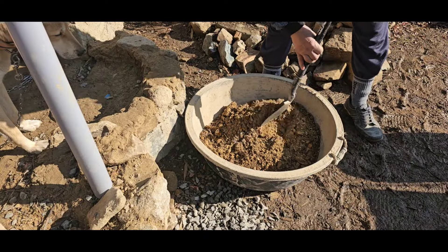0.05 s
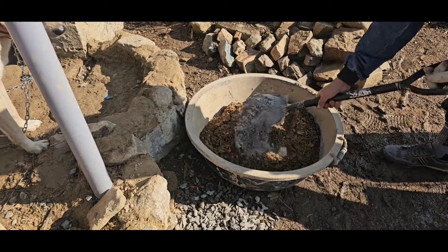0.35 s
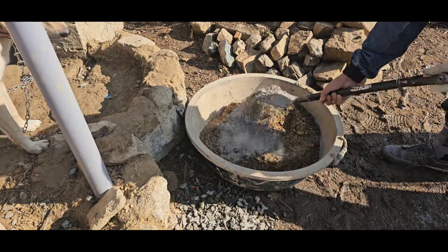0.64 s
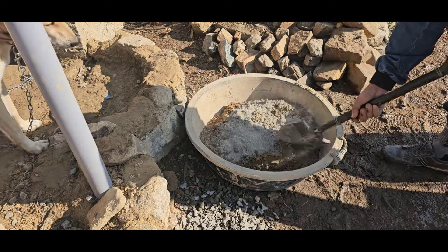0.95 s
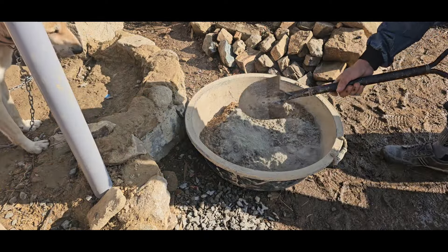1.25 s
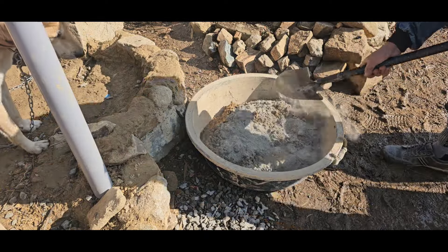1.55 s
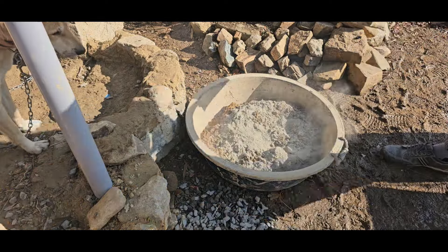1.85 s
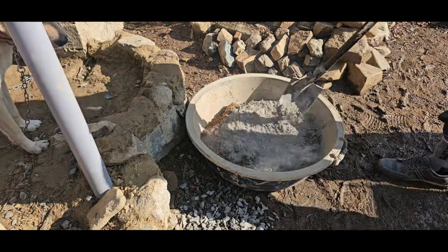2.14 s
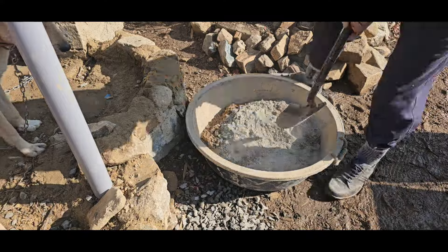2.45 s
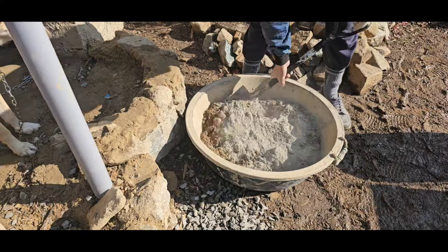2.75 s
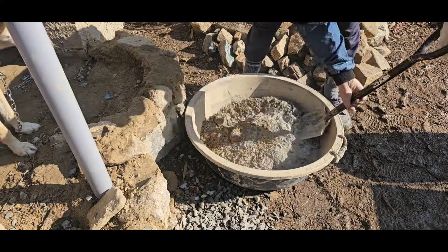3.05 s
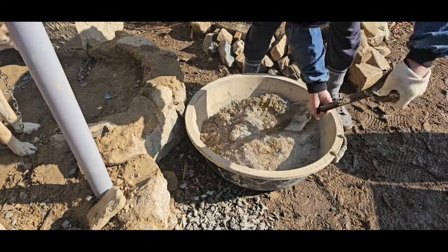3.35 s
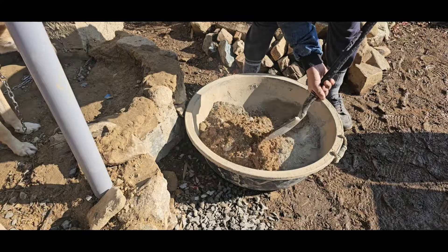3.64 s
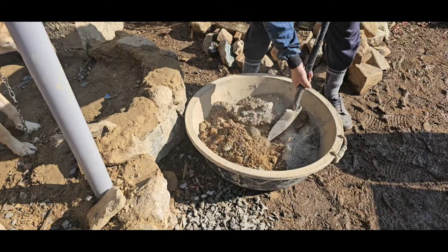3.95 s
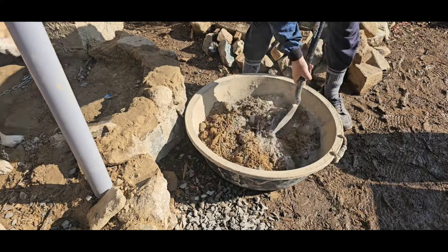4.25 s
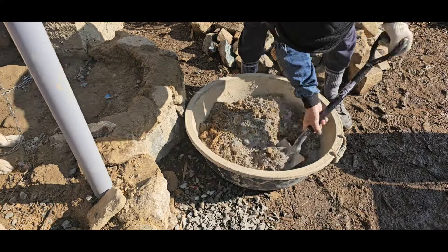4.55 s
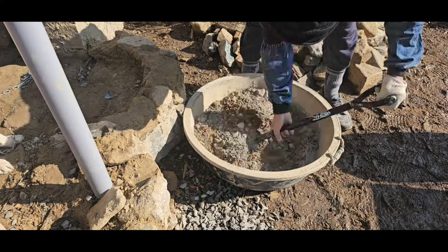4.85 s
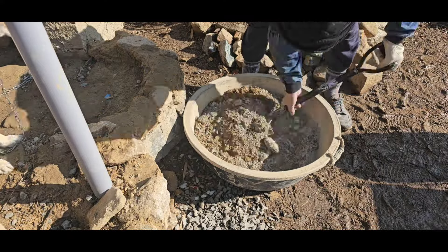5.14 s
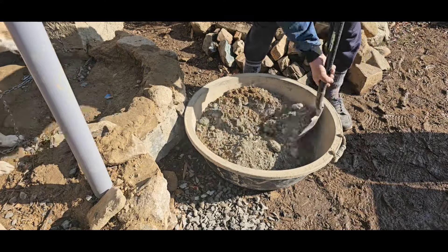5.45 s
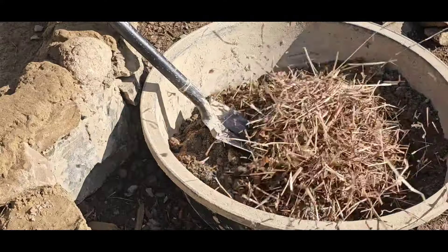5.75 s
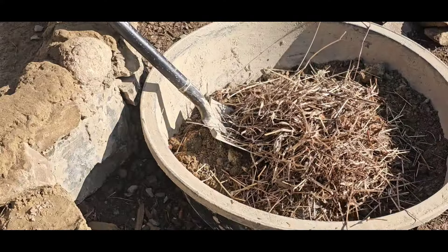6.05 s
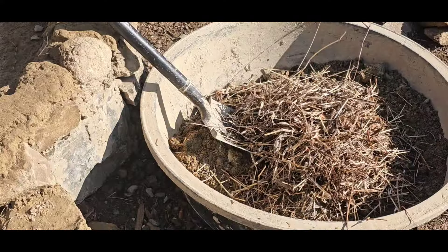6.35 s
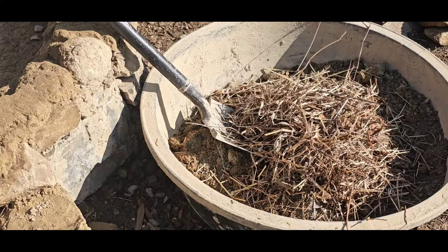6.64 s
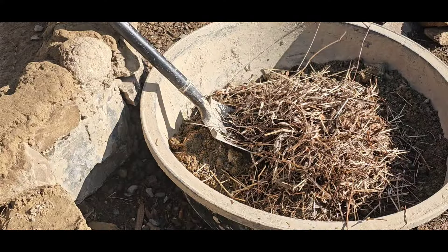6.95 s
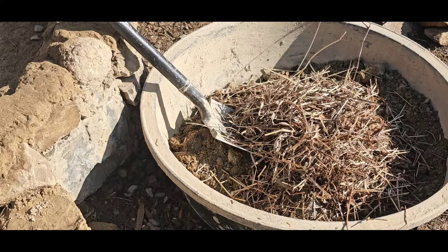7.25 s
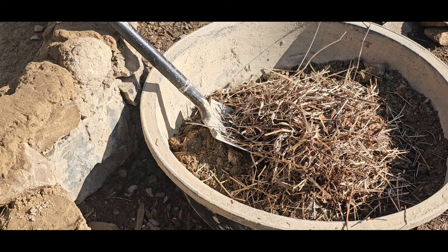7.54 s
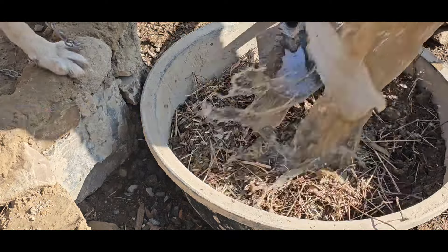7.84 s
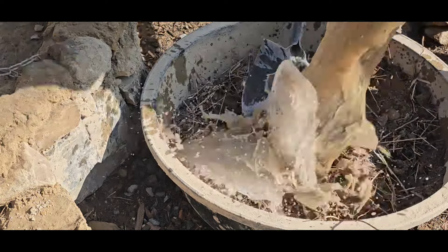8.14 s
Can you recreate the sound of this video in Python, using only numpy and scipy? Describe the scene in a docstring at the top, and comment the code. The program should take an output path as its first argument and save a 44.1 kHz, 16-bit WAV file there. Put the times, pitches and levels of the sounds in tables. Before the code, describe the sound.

A small shovel scrapes gritty soil and knocks on a plastic basin, then straw rustles and water splashes in.

```python
"""A small steel shovel chops and scrapes dry soil and powder in a plastic basin, close to a stereo pair
outdoors. The blade sticks and slips through grit, cracking clods and spilling crumbs; early on it
knocks twice, hard, on the basin. Dry straw drops on the heap and rustles as a light wind reaches the
microphones. Then muddy water is dumped in, splashing and gurgling, and the blade clangs twice."""
import sys
import numpy as np
from scipy import signal
from scipy.fft import rfft, irfft
from scipy.io import wavfile

SR = 44100
rng = np.random.default_rng(int(sys.argv[2]) if len(sys.argv) > 2 else 0)


def pcm_store(signal):
    """Save signal as 16-bit PCM."""
    levels = np.round(np.clip(np.atleast_2d(signal), -1, 1) * 32767)
    wavfile.write(sys.argv[1], SR, levels.astype(np.int16).T)


N = 370440
TIME = np.arange(N) / SR
RIPPLE_DB = 3  # each point of contact has its own small resonances


def gain_of(db):
    return 10 ** (np.asarray(db) / 20)


def unit_rms(x):
    return x / np.sqrt(np.mean(x ** 2) + 1e-20)


def as_hit(x):
    """Scales a short sound to the energy of a hundredth of a second at level 1."""
    return x / np.sqrt(np.mean(np.sum(x ** 2, -1)) / (SR / 100) + 1e-20)


def value_at(curve, hz):
    curve_hz, values = np.transpose(curve)
    return np.interp(np.log(hz + 1), np.log(curve_hz + 1), values)


def add(mix, start_s, sound):
    part = mix[:, max(round(start_s * SR), 0):][:, :sound.shape[-1]]
    part += sound[..., :part.shape[1]]


def colour(x, spectrum, ripple_db=0, size=2048):
    """Causal filter that keeps clicks sharp, with optional random ripple on its spectrum."""
    hz = abs(np.fft.fftfreq(size, 1 / SR))
    ripple = np.interp(hz / 210, np.arange(128), rng.standard_normal(128))
    log_gain = np.log(gain_of(value_at(spectrum, hz) + ripple_db * ripple))
    taps = np.fft.ifft(np.exp(np.conj(signal.hilbert(log_gain)))).real[:size // 2]
    return signal.oaconvolve(x, taps[None], axes=1)[:, :x.shape[1]]


def resonate(x, hz, width_hz):
    """A broad resonance with steep skirts."""
    b, a = signal.iirpeak(min(hz, SR / 3), max(hz / width_hz, .5), fs=SR)
    return signal.lfilter(b, a, signal.lfilter(b, a, x))


def wander(n, per_s):
    """A slow random curve of about unit size."""
    return np.interp(np.arange(n) * per_s / SR, np.arange(4096), rng.standard_normal(4096))


def swell(t, rise_s, fall_s):
    """Grows towards time zero and dies away after it."""
    return np.exp(-abs(t) / np.where(t < 0, rise_s, fall_s))


def ring(modes, t60, t):
    """The modes of a struck body, dying away together."""
    return sum(gain_of(db - 60 * t / t60) * np.sin(2 * np.pi * hz * t) for hz, db in modes)


# How alike the two microphones hear the yard. Each row: frequency in Hz, coherence from 0 to 1.
PAIR_COHERENCE = [(300, 0.95), (1200, 0.88), (2500, 0.62), (10000, 0.14)]

def mic_pair(x):
    """Two unrelated signals become a microphone pair: alike in the bass, apart in the treble."""
    alike = value_at(PAIR_COHERENCE, np.fft.rfftfreq(x.shape[1], 1 / SR))
    mid, side = rfft(x) * np.sqrt([(1 + alike) / 2, (1 - alike) / 2])
    return irfft([mid + side, mid - side], x.shape[1])


def noise(n):
    return mic_pair(rng.standard_normal((2, n)))


def grains(n, per_s, spread_db, clumps_per_s, clump_db=3, dust=0.12):
    """Tiny impacts of uneven size that come in clumps, over a fine dust of noise."""
    sizes = gain_of(spread_db * np.minimum(rng.exponential(1, n), 4))
    impacts = sizes * (rng.random(n) < per_s / SR) * rng.choice([-1., 1.], (2, n))
    clicks = unit_rms(impacts) + dust * rng.standard_normal((2, n))
    return mic_pair(clicks * gain_of(clump_db * wander(n, clumps_per_s)))


# Open air all around the yard. Each row: frequency in Hz, relative level in dB.
AIR_SPECTRUM = [(25, -18.5), (150, -6.5), (2000, -22), (15000, -31.5)]
# Wind right on the microphones. Each row: time in seconds, level in dB.
WIND_LEVELS = [(5.7, -87), (5.78, -69.5), (7, -67.5)]

def air_and_wind(air_db=-79):
    """Faint even air, and wind buffeting the microphones with a lumpy rumble."""
    air = unit_rms(colour(noise(N), AIR_SPECTRUM))
    gusts = noise(N) * gain_of(1.6 * wander(N, per_s=8.5))
    rumble = signal.sosfilt(signal.butter(2, [22, 105], "band", fs=SR, output="sos"), gusts)
    wind_db = np.interp(TIME, *np.transpose(WIND_LEVELS))
    return gain_of(air_db) * air + gain_of(wind_db) * unit_rms(rumble)


def yard(x, wet_db=-19, t60=0.21, dull_hz=2600):
    """Adds weak, dull scatter from the stones and walls around, different at each microphone."""
    t = np.arange(SR // 2) / SR
    tail = rng.standard_normal((2, len(t))) * gain_of(-60 * t / t60)
    tail = signal.lfilter(*signal.butter(1, dull_hz, fs=SR), tail / np.linalg.norm(tail[0]))
    return x + gain_of(wet_db) * signal.oaconvolve(x, tail, axes=1)[:, :N]


def snap(s, db, hz, crack_db, crush_s=0.0012, soil_db=0):
    """A crumb creaks, cracks and crumbles, ringing what it touches and the soil; gives start, sound."""
    t = np.arange(-256, 1792) / SR
    creak = 0.16 * np.exp(-abs(t) / 0.0018)
    crumble = np.exp(-abs(t) / crush_s) + 0.053 * np.exp(-abs(t) / 0.01)
    click = 2.5 * (t == 0) * [[1], [0]]
    burst = mic_pair(rng.standard_normal((2, len(t))) * np.where(t < 0, creak, crumble) + click)
    soil = gain_of(soil_db) * as_hit(colour(burst, RASP_SPECTRUM, RIPPLE_DB))
    body = as_hit(soil + as_hit(resonate(burst, hz, 0.7 * hz)))
    crack = gain_of(crack_db) * as_hit(colour(burst, GRIT_SPECTRUM, RIPPLE_DB))
    return s + t[0], gain_of(db) * (body + crack)


# Soil sliding off the blade and down the heap.
# Each row: middle in seconds, half length in seconds, level in dB.
SOIL_SPILLS = [(1.099, 1.88, -87.5), (3.515, 0.071, -64.5), (3.689, 0.093, -67.5), (4.78, 0.072, -58.5),
               (5.077, 0.13, -61), (5.546, 0.039, -58)]

def spills(crumbs_per_s=34, crumb_db=6.5, spread_db=14, hiss_db=-6, steel_hz=2322):
    """Fine soil trickles over steel; loose bits roll with it, each its own size and pitch, few large."""
    out, power = np.zeros((2, N)), np.zeros(N)
    fines = grains(N, per_s=7100, spread_db=6.5, clumps_per_s=210)
    trickle = unit_rms(resonate(fines, steel_hz, 1600)) + unit_rms(colour(fines, RASP_SPECTRUM))
    trickle += gain_of(hiss_db) * unit_rms(colour(fines, GRIT_SPECTRUM))
    for middle, half, db in SOIL_SPILLS:
        slide = np.exp(-np.minimum(((TIME - middle) / half) ** 2, 20))
        power += (gain_of(db) * slide) ** 2
        for when, size, pitch, softness in rng.random((round(2 * half * crumbs_per_s), 4)):
            s = middle + half * (2 * when - 1)
            bit_db = db + crumb_db + spread_db * (size ** 2 - .5)
            add(out, *snap(s, bit_db, hz=1500 * 2 ** pitch, crack_db=-14 * softness))
    return out + np.sqrt(power) * unit_rms(trickle)


# Straw moving on the heap, a little to the right. Each row: crest, rise and fall in seconds,
# crackle level in dB, low rustle in dB relative to the crackle.
STRAW_MOVES = [(5.777, 0.011, 0.06, -39.5, -20), (5.849, 0.027, 0.086, -40, -10),
               (6.533, 0.0051, 0.017, -41.5, -7.5), (6.65, 0.14, 0.12, -54, -13),
               (6.958, 0.11, 0.059, -50.5, -21), (7.278, 0.027, 0.054, -47.5, -7),
               (7.42, 0.15, 0.22, -58.5, -6.5)]
# The crackle of dry stalks. Each row: frequency in Hz, relative level in dB.
STALK_SPECTRUM = [(500, -17.5), (1800, -4.5), (6000, -1), (15000, -2.5)]
# Single stalks snapping. Each row: time in seconds, level in dB.
STALK_BREAKS = [(5.77, -44.5), (5.809, -37), (6.142, -59.5), (7.0196, -55.5), (7.144, -67.5),
                (7.2746, -47.5), (7.618, -64)]

def straw(scratch_db=-12, tick_db=-7):
    """Fine stalks crackle together and stiff ones tick singly, over the soft rustle of the bundle."""
    moves = np.array([gain_of(db) * swell(TIME - s, rise, fall) for s, rise, fall, db, _ in STRAW_MOVES])
    crackle_level = np.linalg.norm(moves, axis=0)
    rustle_level = np.linalg.norm(moves * gain_of([[db] for *_, db in STRAW_MOVES]), axis=0)
    stalks = unit_rms(grains(N, per_s=14000, spread_db=0, clumps_per_s=260))
    stalks += gain_of(tick_db) * unit_rms(grains(N, per_s=70, spread_db=4, clumps_per_s=10))
    bundle = grains(N, per_s=4500, spread_db=4, clumps_per_s=49)
    out = crackle_level * unit_rms(colour(stalks, STALK_SPECTRUM))
    out += rustle_level * unit_rms(resonate(bundle, 440, 600))
    out += gain_of(scratch_db) * crackle_level * unit_rms(resonate(bundle, 2000, 750))
    for s, db in STALK_BREAKS:
        add(out, *snap(s, db, hz=10600, crack_db=-5.5, crush_s=0.0011, soil_db=-19))
    return out * gain_of([[-1], [1]])


def bubbles(start_s, low_hz, high_hz, per_s, cycles=9, pitches=20):
    """One second of air pockets, each a short note that rises as it nears the surface."""
    out, t = np.zeros((2, N)), np.arange(SR // 5) / SR
    for hz in np.geomspace(low_hz, high_hz, pitches):
        age = hz * t / cycles
        note = np.sin(2 * np.pi * hz * t * (1 + 0.117 * np.tanh(age / 2))) * np.exp(-age)
        for delay, size, pan in rng.random((round(per_s / pitches), 3)):
            add(out, start_s + delay, gain_of(20 * size) * np.sqrt([[1 - pan], [pan]]) * note)
    return out / np.sqrt(np.mean(out[:, TIME > start_s] ** 2))


# Water splashing and churning in the basin, close up. Each row: frequency in Hz, relative level in dB.
SPLASH_SPECTRUM = [(250, -18.5), (700, 15.5), (1400, 13.5), (4000, 7.5), (8000, 0.5)]
CHURN_SPECTRUM = [(30, -14), (100, 2.5), (175, 14.5), (550, 1), (2500, -25)]
# Slugs of water that swell the pour. Each row: time in seconds, level in dB over the steady flow.
WATER_SURGES = [(7.953, 9), (8.022, 2.5), (8.128, 1), (8.192, 5), (8.361, 2.5)]

def pour(start_s=7.668, splash_db=-32, churn_db=-39, sag_db_per_s=7,
         fizz_db=-5, spray_db=-5, gurgle_db=-1):
    """Water hits straw and soil: it churns at once, splashes more as it pools, and each slug slaps."""
    age = np.maximum(TIME - start_s, 0)
    surges = sum(gain_of(db) * swell(TIME - s, rise_s=0.002, fall_s=0.02) for s, db in WATER_SURGES)
    flow = gain_of(-sag_db_per_s * age) * (1 + surges)
    pooled = np.minimum(age / 0.2, 1)
    churn_onset = np.minimum(age / 0.045, 1) ** 2
    drops = grains(N, per_s=5000, spread_db=4.5, clumps_per_s=55)
    slugs = grains(N, per_s=1600, spread_db=2.5, clumps_per_s=62)
    droplets = grains(N, per_s=6100, spread_db=4, clumps_per_s=140)
    splash = unit_rms(colour(drops, SPLASH_SPECTRUM))
    splash += gain_of(fizz_db) * bubbles(start_s, 599, 7970, per_s=400)
    splash += gain_of(spray_db) * pooled * unit_rms(colour(droplets, GRIT_SPECTRUM))
    churn = unit_rms(colour(slugs, CHURN_SPECTRUM))
    churn += gain_of(gurgle_db) * pooled * bubbles(start_s, 191.6, 867, per_s=100, cycles=5.5)
    out = flow * (gain_of(splash_db) * pooled * splash + gain_of(churn_db) * churn_onset * churn)
    for s, db in WATER_SURGES:
        add(out, *snap(s, splash_db + db, hz=1510, crack_db=0, crush_s=0.0055))
    return out


# Modes of the plastic basin. Each row: frequency in Hz, relative level in dB.
BASIN_MODES = [(120, -6), (178, -2.5), (244, -5.5), (388, 3), (527, -3), (625, 0.5), (760, -3)]

def knock(s, db, hz, decay_s, ring_db=-11, t60=0.11, rattle_db=-14, crack_db=-28):
    """A damped swing of the plastic wall, its low modes and soil rattling inside; gives start, sound."""
    t = np.arange(SR // 4) / SR
    swing = -np.sin(2 * np.pi * hz * t) * np.exp(-t / decay_s) * (1 - np.exp(-t / 0.00078))
    wall = as_hit(swing) + gain_of(ring_db) * as_hit(ring(BASIN_MODES, t60, t))
    jolt = noise(len(t)) * (np.exp(-t / 0.0056) + 0.11 * np.exp(-t / 0.032))
    rattle = gain_of(rattle_db) * as_hit(colour(jolt, RASP_SPECTRUM, RIPPLE_DB))
    crack = gain_of(crack_db) * as_hit(colour(jolt, GRIT_SPECTRUM))
    return s, gain_of(db) * (wall + rattle + crack)


# Heavy slugs of water on the basin floor. Each row: start in seconds, level in dB, pitch in Hz.
WATER_PLUNGES = [(8.025, -16.5, 409), (8.0321, -14, 584), (8.037, -19, 273), (8.197, -30, 261),
                 (8.2673, -17, 423), (8.342, -23.5, 490)]

def plunges(decay_cycles=4.3, heave_hz=198):
    """Plunging water swings the wall for several cycles and heaves the whole basin."""
    out = np.zeros((2, N))
    for s, db, hz in WATER_PLUNGES:
        add(out, *knock(s, db, hz, decay_cycles / hz))
        add(out, *knock(s, db, heave_hz, decay_s=0.002))
    return out


# Soil and straw landing in the basin. Each row: start in seconds, level in dB, pitch in Hz.
SOFT_LANDINGS = [(0.3531, -40.5, 503), (1.0098, -48.5, 326), (2.72, -53, 147), (3.355, -43, 400),
                 (4.3948, -44, 302), (4.6414, -42.5, 259), (5.381, -41, 257), (7.2737, -45.5, 496),
                 (7.3858, -40.5, 524)]

def thumps(decay_cycles=1.07):
    """A soft load gives the wall a dull swing that dies at once."""
    out = np.zeros((2, N))
    for s, db, hz in SOFT_LANDINGS:
        add(out, *knock(s, db, hz, decay_cycles / hz))
    return out


# Hard raps of the shovel on the basin, close up. Each row: start in seconds, level in dB.
SHOVEL_RAPS = [(1.4769, -17), (1.6936, -17.5)]

def raps(decay_s=0.0012, rebound_s=0.0065, settle_s=0.088):
    """The shovel hits the wall, rebounds and touches again; the jolted soil then lands."""
    out = np.zeros((2, N))
    for s, db in SHOVEL_RAPS:
        add(out, *knock(s, db, hz=654, decay_s=decay_s))
        add(out, *knock(s + rebound_s, db - 10, hz=477, decay_s=decay_s))
        add(out, *snap(s + settle_s, db - 39, hz=900, crack_db=-35))
    return out


# Modes of the steel blade. Each row: frequency in Hz, relative level in dB.
BLADE_MODES = [(1543, -0.5), (1814, -6.5), (1967, 2.5), (2685, -10.5), (3170, -10.5)]
# The blade struck during the pour.
# Each row: start in seconds, level in dB, seconds for the ring to fall 60 dB, pitch ratio.
BLADE_STRIKES = [(7.951, -25, 0.52, 1), (8.024, -21, 0.16, 1.06)]

def clangs(wash_db=-2):
    """The blade clangs in a wash of splashing that outlasts the ring; water damps the second clang."""
    out, t = np.zeros((2, N)), np.arange(SR // 2) / SR
    for s, db, t60, pitch in BLADE_STRIKES:
        wash = colour(noise(len(t)), SPLASH_SPECTRUM) * np.exp(-t / 0.099)
        steel = ring([(hz * pitch, mode_db) for hz, mode_db in BLADE_MODES], t60, t)
        add(out, s, gain_of(db) * (steel + gain_of(wash_db) * as_hit(wash)))
    return out


# Pebbles meeting the blade. Each row: time in seconds, level in dB.
PEBBLE_TICKS = [(0.17, -64), (0.2146, -46.5), (2.8921, -39.5), (3.639, -53.5), (3.7802, -35.5),
                (3.928, -41.5), (4.047, -40.5), (4.5703, -44.5), (4.7991, -33.5), (4.805, -34),
                (5.087, -43.5), (5.306, -43)]

def pebbles(centre_hz=2230, spread_octaves=0.5):
    """Pebbles tick on the steel, each at a slightly different pitch."""
    out = np.zeros((2, N))
    for s, db in PEBBLE_TICKS:
        hz = centre_hz * 2 ** (spread_octaves * (rng.random() - .5))
        add(out, *snap(s, db, hz, crack_db=-11.5, crush_s=0.00093, soil_db=-6.5))
    return out


# Clods and grit under the blade. Each row: time in seconds, level in dB, crack in dB over the body.
CLOD_CRACKS = [(0.2675, -45, -22), (1.825, -71, 7.5), (2.7421, -51.5, 7.5), (2.7932, -37.5, -6),
               (3.355, -40.5, 0.5), (3.7542, -31, 3), (3.8828, -35.5, -11.5), (3.9089, -31, -2.5),
               (4.0237, -26.5, -7.5), (4.129, -51, 6), (4.17, -44.5, -4.5), (4.3017, -33, 1.5),
               (4.3932, -34.5, -3), (4.8557, -33, -3), (5.0327, -35.5, -3.5), (5.1334, -34, -7.5),
               (5.372, -55, 19)]

def clods():
    """Clods crack at the pitch of the push that starts nearest in time."""
    out = np.zeros((2, N))
    for s, db, crack_db in CLOD_CRACKS:
        *_, hz = min(SHOVEL_PUSHES, key=lambda push: abs(push[0] - s))
        add(out, *snap(s, db, hz, crack_db, crush_s=0.0025))
    return out


# The rasp of dry soil and the hiss of its grit. Each row: frequency in Hz, relative level in dB.
RASP_SPECTRUM = [(80, -28.5), (420, 0.5), (1000, 9.5), (2600, 5.5), (3600, -9.5), (7000, -19.5)]
GRIT_SPECTRUM = [(1200, -66.5), (3000, -7.5), (4500, 0.5), (8500, -4), (15000, -14)]
# Pushes of the blade through soil, close to the microphones.
# Each row: start in seconds, length in seconds, level in dB, centre of the rasp in Hz.
SHOVEL_PUSHES = [(0.234, 0.06, -49.5, 477), (0.31, 0.049, -41.5, 564), (0.403, 0.0091, -47.5, 1120),
                 (0.609, 0.076, -55.5, 406), (1.115, 0.022, -61.5, 416), (1.154, 0.032, -62.5, 375),
                 (1.915, 0.024, -55.5, 900), (2.127, 0.01, -50, 850), (2.275, 0.0047, -63, 950),
                 (2.382, 0.016, -60, 3170), (2.571, 0.018, -45, 1330), (2.66, 0.019, -53, 2200),
                 (2.736, 0.06, -43.5, 1170), (2.994, 0.0097, -45.5, 980), (3.029, 0.036, -52.5, 980),
                 (3.116, 0.053, -45.5, 980), (3.303, 0.019, -52, 1140), (3.35, 0.05, -43, 1440),
                 (3.408, 0.054, -37, 2380), (3.723, 0.04, -44.5, 2280), (3.864, 0.047, -42.5, 1170),
                 (4.008, 0.017, -37, 1470), (4.122, 0.036, -52, 1990), (4.261, 0.019, -40.5, 2350),
                 (4.392, 0.0073, -40, 836), (4.487, 0.012, -52, 1620), (4.573, 0.057, -29.5, 1196),
                 (4.849, 0.051, -33, 1281), (4.983, 0.012, -50.5, 1540), (5.121, 0.067, -36, 1005),
                 (5.374, 0.024, -39.5, 1180), (5.412, 0.033, -34.5, 1580), (5.452, 0.031, -36.5, 1400),
                 (5.591, 0.022, -39, 2200), (5.612, 0.028, -35.5, 1210)]

def shovel(bite_s=0.0059, swell_db=10.5, release_s=0.011, crumble_db=-22, crumble_s=0.046,
           broad_hz=1900, note_hz=1120, note_full_db=-23.5):
    """The blade sticks and slips in grit; soil damps it to one resonance; hard pushes sound its note."""
    out, t = np.zeros((2, N)), np.arange(SR // 4) / SR
    for start, length, db, hz in SHOVEL_PUSHES:
        bite = np.minimum(t / bite_s, 1)
        press = gain_of(swell_db * (t / length - 1))
        release = np.exp((length - t) / release_s)
        crumble = (t > length) * gain_of(crumble_db) * np.exp(-abs(t - length) / crumble_s)
        push = np.maximum(bite * np.where(t < length, press, release), crumble)
        grit = grains(len(t), per_s=3000, spread_db=6, clumps_per_s=150)
        sand = grit + grains(len(t), per_s=3700, spread_db=5, clumps_per_s=82)
        width_hz = hz * min(hz / broad_hz, 1)  # dull pushes ring the basin floor narrowly
        rasp = unit_rms(colour(grit, RASP_SPECTRUM, RIPPLE_DB))
        rasp += 1.19 * unit_rms(resonate(grit, hz, width_hz))
        rasp += min(gain_of(db - note_full_db), 1) * unit_rms(resonate(grit, note_hz, width_hz=160))
        hiss = colour(sand, GRIT_SPECTRUM, RIPPLE_DB)
        hiss_db = -4 + 3.5 * np.log2(hz / 1000)  # a sharper rasp hisses more
        for layer, layer_db in (rasp, db), (hiss, db + hiss_db):
            add(out, start, gain_of(layer_db) * unit_rms(layer * push) * np.sqrt(np.mean(push ** 2)))
    return out


def scene():
    """The work at the basin up close, with the yard and the open air behind it."""
    digging = shovel() + clods() + pebbles()
    basin = raps() + thumps() + plunges()
    return yard(digging + basin + clangs() + spills() + straw() + pour()) + air_and_wind()


def record(dry):
    """The recorder passes nothing much above 15.8 kHz."""
    lowpass = signal.firwin(255, 15800, window=("kaiser", 9), fs=SR)
    return signal.oaconvolve(dry, lowpass[None], "same")


dry = scene()
out = record(dry)
pcm_store(out)
```